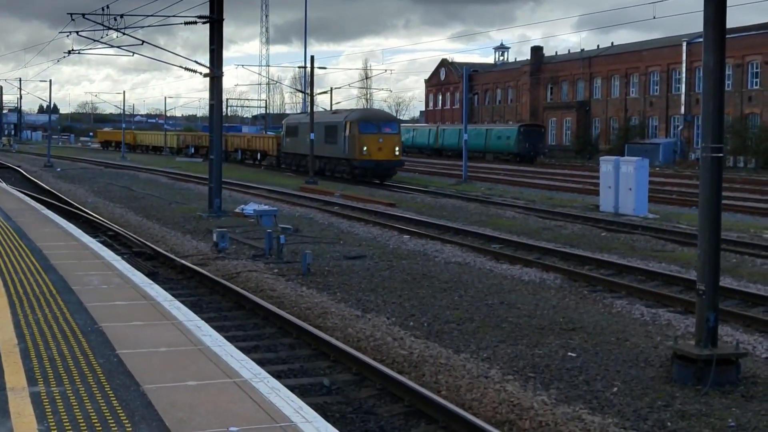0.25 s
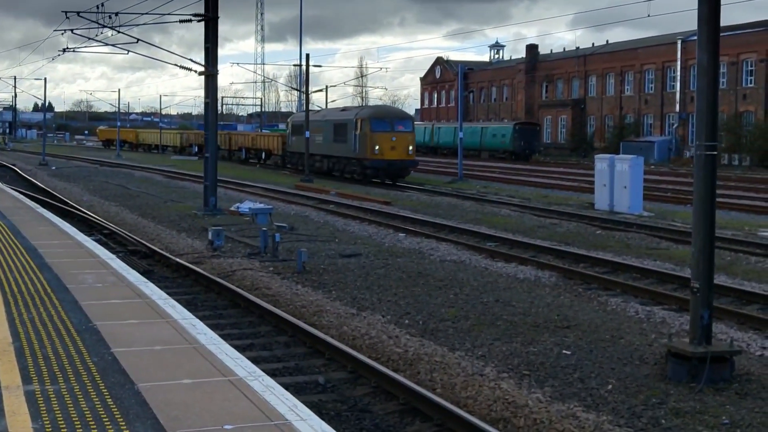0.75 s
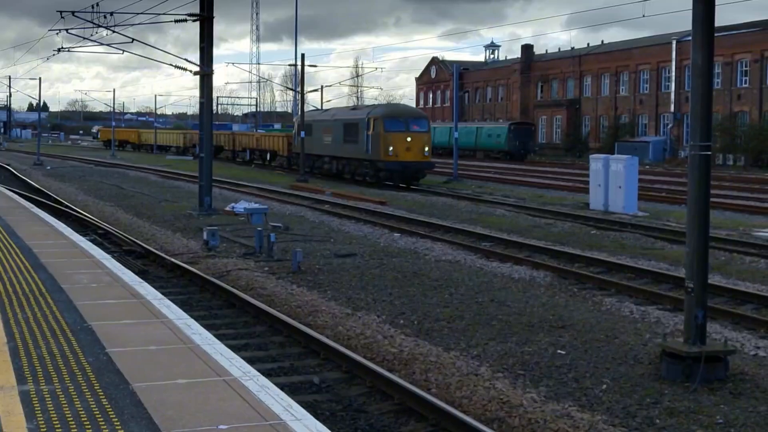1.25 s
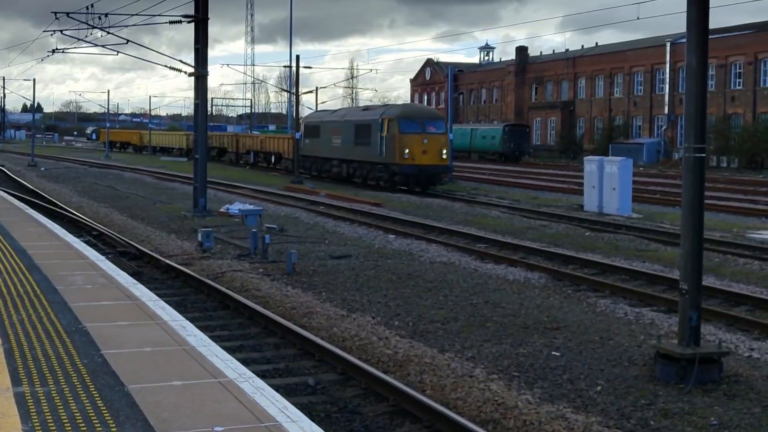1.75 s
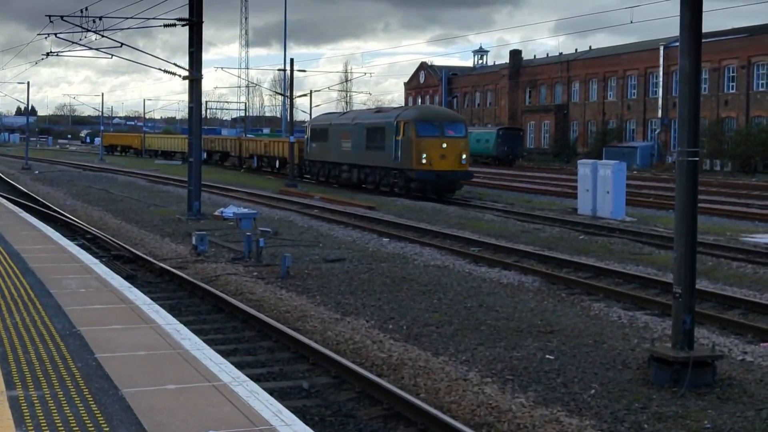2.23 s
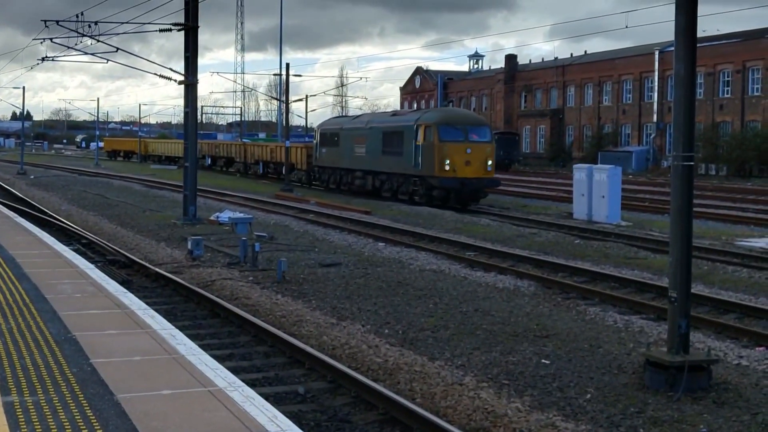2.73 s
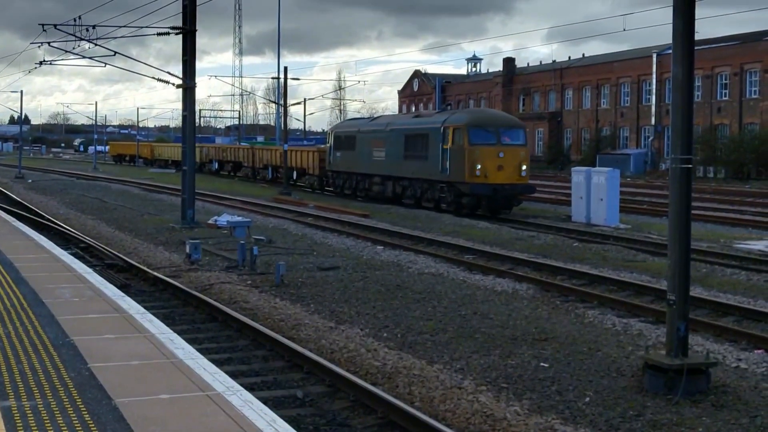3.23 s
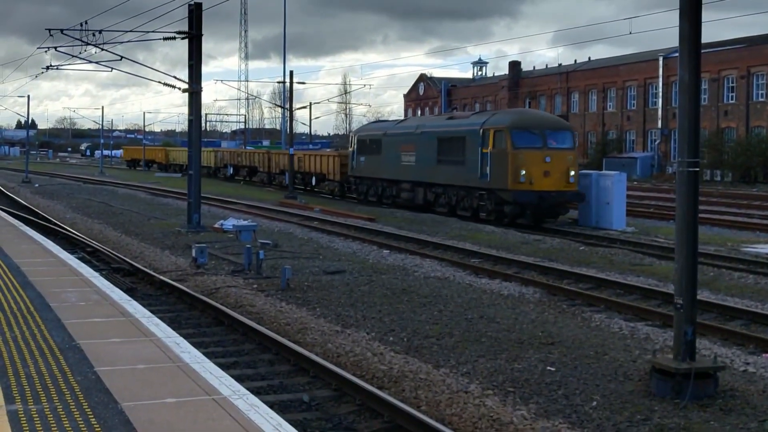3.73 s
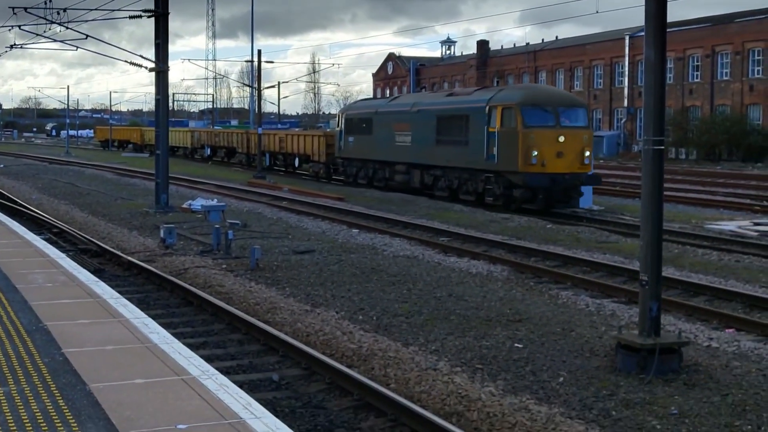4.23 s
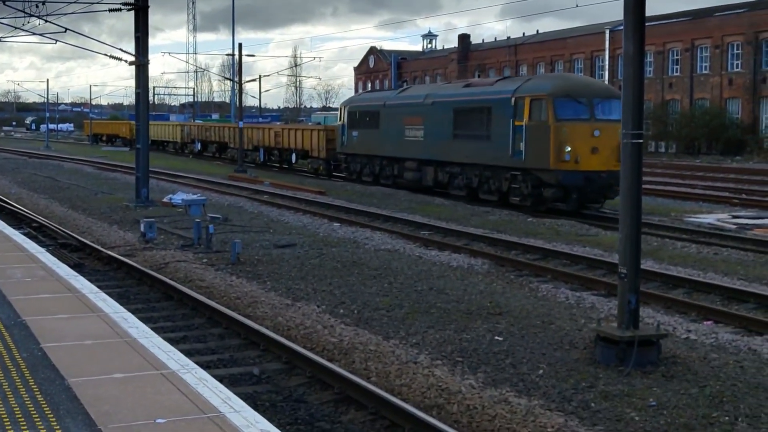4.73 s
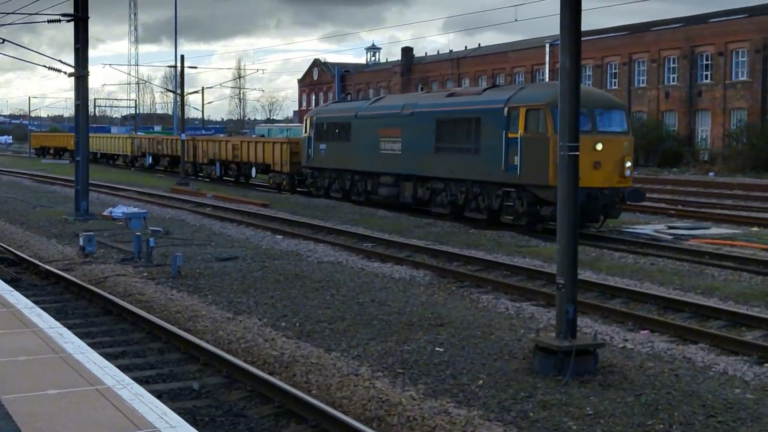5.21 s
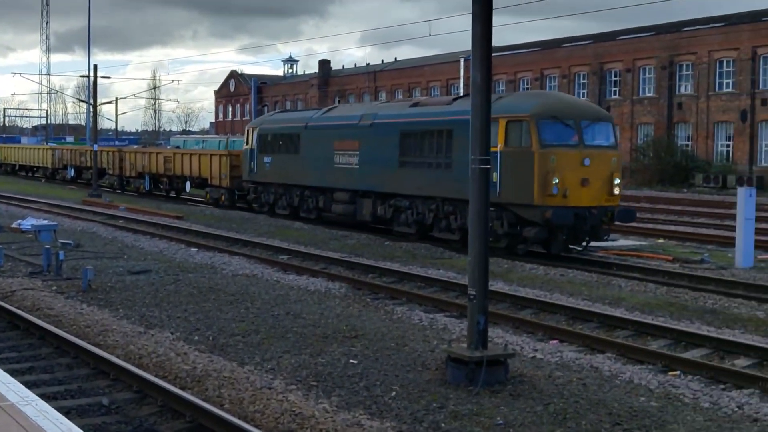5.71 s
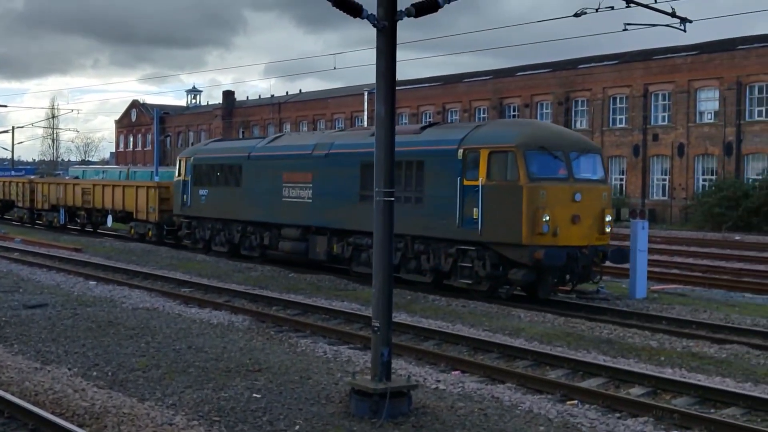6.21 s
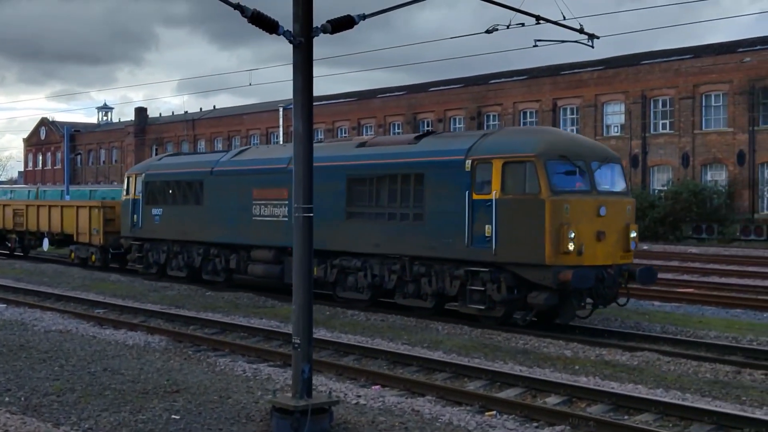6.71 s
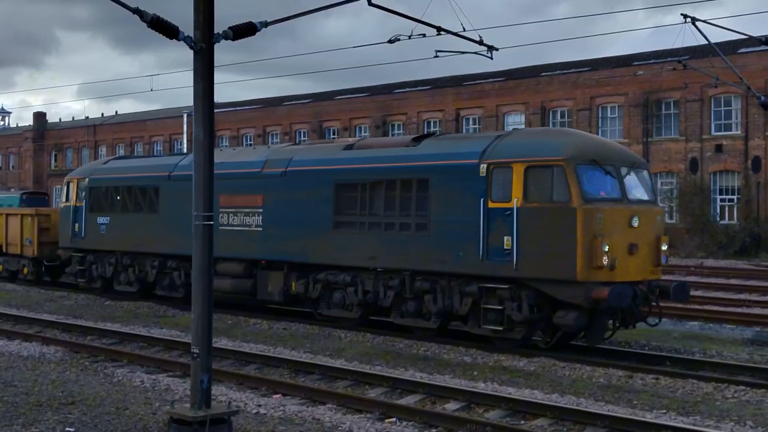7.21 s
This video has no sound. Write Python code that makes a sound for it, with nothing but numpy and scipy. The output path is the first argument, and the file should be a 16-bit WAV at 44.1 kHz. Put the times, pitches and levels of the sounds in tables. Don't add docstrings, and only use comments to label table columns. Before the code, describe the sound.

A diesel locomotive drones closer across the yard, wagons clattering over rail joints, while gusty wind thumps and roars on the microphone.

```python
import sys
import numpy as np
from scipy import signal
from scipy.fft import rfft, irfft, next_fast_len
from scipy.io import wavfile
from scipy.ndimage import uniform_filter1d

SR = 44100
rng = np.random.default_rng(int(sys.argv[2]) if len(sys.argv) > 2 else 0)


def volts_from_decibels(level):
    exponent = np.asarray(level, float) / 20
    return 10 ** exponent


def wrap_up_sound(samples):
    columns = np.atleast_2d(samples).T
    tamed = np.clip(columns, -1, 1)
    steps = np.round(tamed * 32767).astype(np.int16)
    wavfile.write(sys.argv[1], SR, steps)


N = 328986
TIME = np.arange(N) / SR
CYCLE_HZ = 4.579


def evened(x):
    return x / np.sqrt(np.mean(x ** 2) + 1e-20)


def read(points, hz):
    f, value = np.transpose(points)
    return np.interp(np.log(hz + 1), np.log(f + 1), value)


def column(table, axis):
    rows = np.array(table)
    return np.interp(TIME, rows[:, 0], rows[:, axis])


def add(mix, s, sound):
    part = mix[round(s * SR):][:len(sound)]
    part += sound[:len(part)]


def smoothed(x, rows, columns):
    return uniform_filter1d(uniform_filter1d(x, size=rows, axis=0), size=columns, axis=1)


def wander(count, size):
    return evened(uniform_filter1d(rng.standard_normal(count), size=size))


def noise(spectrum, patchy_db, flicker_db, size=1024):
    frames, hz = 4 * N // size + 5, np.fft.rfftfreq(size, 1 / SR)
    a, b, patches = rng.standard_normal((frames, len(hz), 3)).T
    patches = evened(smoothed(patches, rows=9, columns=9))
    level_db = read(spectrum, hz)[:, None] + patchy_db * patches + flicker_db * wander(frames, size=5)
    z = (a + 1j * b) * volts_from_decibels(level_db)
    return evened(signal.istft(z, nperseg=size, noverlap=3 * size // 4)[1][:N])


def cyclic(spectrum, memory):
    turn = round(SR / CYCLE_HZ)
    fresh = rng.standard_normal((N // turn + 2, turn))
    renewal = np.sqrt(1 - memory ** 2)
    kept = signal.lfilter([renewal], [1, -memory], fresh[1:], axis=0, zi=memory * fresh[:1])[0]
    size = next_fast_len(N)
    colour = volts_from_decibels(read(spectrum, np.fft.rfftfreq(size, 1 / SR)))
    return evened(irfft(rfft(kept.ravel()[:N], size) * colour, size)[:N])


def wavering(hz, width_hz, steady):
    r = np.exp(-np.pi * width_hz / SR)
    z = rng.standard_normal(N) + 1j * rng.standard_normal(N)
    for _ in range(2):
        z = signal.lfilter([1 - r], [1, -r], z)
    z = z / np.sqrt(np.mean(abs(z) ** 2))
    return evened(((steady + z) * np.exp(2j * np.pi * hz * TIME)).real)


def swells(rows, bed_db, extra_db=0):
    drop_db, curve = 15, 2.46
    s, half, db = np.array(rows)[:, :3].T
    t = TIME[::64, None]
    power = volts_from_decibels(2 * (db + extra_db - drop_db * abs((t - s) / half) ** curve)).sum(axis=1)
    return np.sqrt(volts_from_decibels(2 * bed_db) + np.interp(TIME, t[:, 0], power))


# time in seconds, nearness in dB.
NEAR = [(0.0, -12), (0.35, -10), (0.68, -14), (0.9, -11.5), (1.3, -10), (1.6, -9), (2.5, -9.5), (3.0, -6),
        (3.25, -8), (4.1, -6.5), (4.6, -7.5), (5.0, -5), (5.5, -3), (5.9, -2.5), (6.3, -1.5), (6.8, 0.5),
        (7.0, 0), (7.46, -1)]


def follows(nearest_db, per_db):
    return nearest_db + per_db * column(NEAR, axis=1)


# peak in seconds, half length in seconds, extra rumble in dB, extra hiss in dB.
SURGES = [(0.299, 0.39, -1, -4.5), (0.59, 0.047, 1, 11), (1.282, 0.055, 3.5, 9), (1.426, 0.042, 1.5, 1),
          (2.35, 0.1, 0.5, 3.5), (2.998, 0.11, -1, -1.5), (4.505, 0.39, 1, 5.5), (5.306, 0.59, -1, 2),
          (5.72, 0.11, 0.5, 2), (6.06, 0.12, 3.5, 1), (6.881, 0.069, 3.5, 8), (6.982, 0.06, -3, -5.5),
          (7.11, 0.27, 2, 3), (7.336, 0.1, 2.5, 4.5), (7.386, 0.052, -4, 0.5), (7.46, 0.03, -1, 12)]


def shudder(axis):
    rows, t = np.array(SURGES), TIME[::64, None]
    bumps = rows[:, axis] * np.exp(-2 * ((t - rows[:, 0]) / rows[:, 1]) ** 2)
    return np.interp(TIME, t[:, 0], bumps.sum(axis=1))


# time in seconds, strength in dB.
WIND = [(0.0, -28), (0.52, -29.5), (0.545, -42), (0.75, -37), (0.79, -29.5), (1.3, -26), (1.8, -25),
        (1.95, -27.5), (2.4, -27), (3.2, -27.5), (4.1, -27.5), (4.5, -26.5), (5.2, -24.5), (6.5, -22.5),
        (7.0, -30.5), (7.33, -19), (7.37, -48), (7.46, -22)]
# peak in seconds, half length in seconds, buffeting in dB, upper roar relative in dB.
GUSTS = [(0.25, 0.056, -22, -14.5), (0.365, 0.035, -16.5, -14), (0.461, 0.034, -11, -17),
         (0.932, 0.07, -24.5, -11), (1.123, 0.022, -25, -3.5), (1.43, 0.095, -29, -11),
         (1.508, 0.062, -20, -14), (1.68, 0.095, -21.5, -30), (2.025, 0.03, -22, -10.5),
         (2.118, 0.15, -21.5, -20), (2.58, 0.054, -25.5, -31), (2.746, 0.03, -23.5, -14),
         (2.96, 0.075, -22.5, -25.5), (3.475, 0.054, -37, -12), (3.91, 0.098, -30, -5.5),
         (4.487, 0.17, -26.5, -7.5), (4.72, 0.22, -37, -20), (5.34, 0.17, -22.5, -15),
         (5.624, 0.035, -25, -4), (5.902, 0.03, -32, -3), (6.17, 0.1, -28, -6), (6.297, 0.094, -22, -9),
         (6.57, 0.06, -35.5, 1), (6.685, 0.04, -17.5, -4), (6.772, 0.06, -18.5, 0),
         (6.871, 0.08, -19.5, 1.5), (6.987, 0.072, -26.5, 3), (7.064, 0.061, -16.5, 2.5),
         (7.148, 0.1, -15.5, -3.5), (7.215, 0.039, -18.5, -1.5), (7.312, 0.059, -15.5, -8.5)]
# frequency in Hz, level in dB per Hz.
BUFFET = [(8.8, -38.5), (15, -12), (29, 1.5), (48, -0.5), (109, -8.5), (140, -19.5), (166, -17),
          (200, -19.5), (260, -33.5), (440, -120)]
# frequency in Hz, level in dB per Hz.
UPPER_WIND = [(60, -24.5), (110, 10.5), (200, -1.5), (350, -8.5), (500, -20.5), (800, -31), (1200, -46),
              (2500, -120)]
# start in seconds, length in seconds, level in dB.
PUFFS = [
    (6.672, 0.074, -31.5),
    (6.736, 0.06, -27),
    (6.836, 0.026, -34),
    (6.878, 0.027, -44),
    (7.039, 0.062, -17),
    (7.111, 0.04, -23),
    (7.143, 0.055, -21),
    (7.197, 0.055, -30),
    (7.273, 0.067, -30.5),
]
# frequency in Hz, level in dB per Hz.
PUFF_COLOUR = [(60, -30), (110, 2), (200, -2), (350, -4), (600, -10.5), (950, -20), (1300, -33),
               (2500, -120)]
# peak in seconds, half length in seconds, level in dB.
MOANS = [
    (5.64, 0.1, -33.5),
    (6.05, 0.3, -36),
    (6.45, 0.41, -36.5),
]


def wind():
    strength = column(WIND, axis=1)
    low = volts_from_decibels(1.67) * swells(GUSTS, strength) * noise(BUFFET, patchy_db=1.0, flicker_db=0.5, size=2048)
    low = low + swells(MOANS, bed_db=-74.5) * wavering(hz=282.7, width_hz=73, steady=0)

    common = noise(UPPER_WIND, patchy_db=1.5, flicker_db=1.0, size=512)
    apart = noise(UPPER_WIND, patchy_db=1.5, flicker_db=1.0, size=512)
    upper = np.array([1.06 * common + 0.21 * apart, 1.35 * common - 0.064 * apart])
    bed_db = -40 + 0.45 * (strength - strength.mean())
    upper = volts_from_decibels(-2.5) * swells(GUSTS, bed_db, extra_db=np.array(GUSTS)[:, -1]) * upper

    puffs = np.zeros(N)
    for s, length, db in PUFFS:
        add(puffs, s, volts_from_decibels(db) * signal.windows.tukey(round(length * SR), .6))
    puffs = puffs * noise(PUFF_COLOUR, patchy_db=1.5, flicker_db=1, size=512)
    return low + upper + np.array([[.2], [1.8]]) * puffs


# snap in seconds, peak in dB, lead of its first tick in seconds.
SNAPS = [
    (3.08, -46.5, 0.052),
    (3.3586, -48, .0395),
    (4.28, -47.5, 0.038),
    (4.553, -47.5, 0.025),
    (4.829, -48, 0.032),
]
# time in seconds, peak in dB.
RUSTLES = [(0.3406, -71), (0.4763, -60), (0.7294, -68.5), (1.06, -73.5), (1.3212, -64), (1.37, -67),
           (1.43, -71), (1.49, -71), (5.3378, -72), (6.83, -63), (6.8694, -58)]
# frequency in Hz, level in dB.
TICK_COLOUR = [(1500, -15), (3000, 7), (6000, 13.5), (8000, 0), (9000, -2), (14000, -1), (16000, -16)]


def ticks():
    out, t = np.zeros(N), np.arange(6000) / SR
    hz = np.fft.rfftfreq(len(t), 1 / SR)
    colour = volts_from_decibels(read(TICK_COLOUR, hz))
    snaps = []
    for s, db, lead in SNAPS:
        snaps += [(s - lead, db - 9.5), (s, db), (s + 0.053, db - 9)]
    rustle_colour = colour * (hz > 9300)
    for group, tint, t60 in ((snaps, colour, .045), (RUSTLES, rustle_colour, .24)):
        for s, db in group:
            burst = irfft(rfft(rng.standard_normal(len(t))) * tint, len(t))
            add(out, s - .001, volts_from_decibels(db + 6) * burst * (1 - np.exp(-t / .001)) * volts_from_decibels(-60 * t / t60))
    return out


# time in seconds, peak in dB, ring in Hz, low clank relative in dB.
JOINTS = [(0.5753, -51, 7200, 7), (1.364, -48.5, 7350, 0), (1.772, -44.5, 6440, -11),
          (1.803, -49, 7000, 5.5), (2.1284, -46.5, 7000, 3), (2.3146, -42, 6800, 1),
          (2.374, -42.5, 6700, 0), (2.4015, -57, 6600, -9), (2.5195, -43, 6600, -6), (2.6537, -47, 7290, 3),
          (2.702, -46, 7400, 2), (2.725, -43, 6800, -3), (2.985, -48, 6700, 2), (3.03, -42, 6700, 4),
          (3.074, -47, 7070, 4), (3.254, -46, 7550, -19), (3.3588, -47, 5700, 7), (3.939, -43, 7100, -16),
          (4.2822, -43, 6450, -6), (4.493, -40, 7100, -2), (4.52, -40, 7050, -9), (4.555, -37.5, 6950, -13),
          (4.8276, -51, 5600, -9), (4.8807, -42, 6970, -13), (4.9747, -41, 6500, -9),
          (5.208, -43, 6530, -4), (5.3368, -40, 6550, -9), (5.434, -50, 7070, -5), (5.5, -43, 7000, -4),
          (5.6048, -42, 7380, 4), (6.118, -37.5, 7730, -17), (6.319, -39.5, 7500, -10),
          (6.4832, -41, 7100, -7.5), (6.8364, -37, 6560, -9), (7.086, -38.5, 7450, -7)]
# time in seconds, peak in dB.
FAR_JOINTS = [(0.212, -54), (0.3733, -56), (0.4424, -54.5), (1.5673, -56.5), (2.1983, -48), (2.469, -50),
              (2.887, -50), (3.321, -55), (3.429, -51), (3.5957, -54.5), (3.724, -49.5), (3.8107, -53),
              (3.959, -57), (4.201, -49.5), (4.36, -51), (4.3864, -52), (4.4603, -47), (5.663, -42),
              (6.0367, -51), (6.2805, -42), (6.6852, -60), (7.269, -43)]


def joints():
    out, t = np.zeros(N), np.arange(6000) / SR
    hz = np.fft.rfftfreq(len(t), 1 / SR)

    def hump(centre_hz, width_hz, order=6):
        return 1 / (1 + ((hz - centre_hz) / width_hz) ** order)

    far = [(s, db, 6570 + 360 * rng.standard_normal(), -4.5) for s, db in FAR_JOINTS]
    shape = (1 - np.exp(-t / 0.007)) * volts_from_decibels(-60 * t / 0.11)
    for s, db, ring_hz, clank_db in JOINTS + far:
        ring = hump(ring_hz, 330) + 0.78 * hump(7200, 450) + 0.67 * hump(6280, 220)
        clank = volts_from_decibels(clank_db + 1.0) * hump(2900, 1200)
        sheen = volts_from_decibels(-16) * hump(10100, 400, order=4)
        burst = irfft(rfft(rng.standard_normal(len(t))) * (ring + clank + sheen), len(t))
        rattle = volts_from_decibels(3.5 * wander(len(t), size=250))
        add(out, s - .002, volts_from_decibels(db + 8.0) * burst * shape * rattle)
    return out


# time in seconds, peak in dB, pitch in Hz.
PINGS = [(2.5042, -44, 6600), (2.5202, -44, 6670), (2.6683, -54, 7300), (2.7307, -46, 5960),
         (2.732, -54, 7300), (2.743, -46, 7350), (2.742, -44, 6200), (2.758, -47, 7300), (3.047, -50, 5700),
         (3.255, -64.5, 7400), (4.2672, -48, 6900), (4.465, -44, 6170), (4.4917, -40, 6140),
         (4.512, -43, 6250), (4.53, -41, 6250), (4.51, -42, 7150), (4.54, -42, 7100), (4.795, -50, 7000),
         (5.7269, -41, 7100), (6.0197, -42, 6940)]


def pings():
    out, t = np.zeros(N), np.arange(3000) / SR
    shape = (1 - np.exp(-t / 0.0016)) * volts_from_decibels(-60 * t / 0.029)
    for s, db, hz in PINGS:
        ring = np.sin(2 * np.pi * hz * t) + .6 * np.sin(2 * np.pi * 1.035 * hz * t)
        add(out, s - .002, volts_from_decibels(db + 3.5) * ring * shape)
    return out


def echoed(x, wet_db, t60):
    t = np.arange(SR // 4) / SR
    taps = rng.standard_normal(len(t)) * (rng.random(len(t)) < .05) * volts_from_decibels(-60 * t / t60)
    return x + volts_from_decibels(wet_db) * signal.oaconvolve(x, taps / np.linalg.norm(taps))[:N]


# start in seconds, length in seconds, pitch in Hz, level, second and fifth partial in dB.
SQUEALS = [
    (1.096, 0.205, 1397, -52.5, 3.5, -2.5),
    (3.462, 0.15, 1387, -51.5, -23, -33),
    (5.503, 0.091, 1420, -48, -17, -26),
    (6.369, 0.3, 1374, -40, -18, -19),
]


def squeals():
    out = np.zeros(N)
    for s, length, hz, db, second_db, fifth_db in SQUEALS:
        t = np.arange(round(length * SR)) / SR
        wobble, fuzz = wander(len(t), size=900), wander(len(t), size=150)
        pitch = hz * (1 + .001 * wobble + .008 * (t / length) ** 6)
        turn = 2 * np.pi * np.cumsum(pitch) / SR
        tone = np.sin(turn) + volts_from_decibels(second_db) * t / length * np.sin(2 * turn)
        if 5 * hz < SR / 2:
            tone = tone + volts_from_decibels(fifth_db) * np.sin(5 * turn + .8 * fuzz)
        fade = signal.windows.tukey(len(t), .45) * np.minimum(t / .05, 1)
        add(out, s, volts_from_decibels(db + 1.2 * wobble) * tone * fade)
    return out


THROB_PHASE = 4.97
# peak in seconds, half length in seconds, level in dB.
BEATS = [
    (2.9, .6, -65),
    (3.95, 0.26, -50.5),
    (4.6, 0.52, -49.5),
    (5.2, 0.53, -46.5),
    (6.2, 0.37, -57.5),
]


def beats():
    turn = 4 * np.pi * CYCLE_HZ * TIME + THROB_PHASE + .1
    bend = 20 / (2 * CYCLE_HZ) * np.sin(turn - 1.6)
    heavier = 1 + .25 * np.cos(turn / 2 + 3.15)
    core = evened((1 + np.cos(turn)) * np.sin(2 * np.pi * 721 * TIME + bend))
    return swells(BEATS, bed_db=-69.5) * heavier * core


# frequency in Hz, level in dB per Hz.
DRONE = [(600, -30.5), (670, -5), (705, 6.5), (720, 8), (740, 2), (785, -11), (860, -42.5)]
# peak in seconds, half length in seconds, level in dB.
BLOWER = [
    (0.1, 0.41, -66),
    (2.2, 0.43, -59.5),
    (2.55, 0.35, -63.5),
    (2.72, 0.11, -53),
    (4.4, .2, -62),
    (5.68, 0.33, -50),
    (6.28, 0.16, -53.5),
    (6.69, 0.18, -50.5),
    (7.14, 0.27, -49),
    (7.46, .1, -51),
]
# peak in seconds, half length in seconds, level in dB.
TRACTION = [
    (0.0, 0.2, -53),
    (2.87, 0.27, -54.5),
    (3.72, 0.33, -60.5),
    (4.45, 0.24, -52.5),
    (4.97, 0.52, -50),
    (6.13, 0.16, -39),
    (6.32, 0.085, -47),
    (6.8, 0.17, -41),
    (7.27, 0.13, -41.5),
]
# frequency in Hz, waver width in Hz, relative level in dB.
GEARS = [(358, 30, 7), (442, 30, 6), (1446, 16, -6), (1869, 30, -1.5), (2432, 32, 1.5), (2676, 8, -9),
         (3542, 45, -7), (3215, 60, -6), (845, 27, -1), (1010, 70, 0)]
# peak in seconds, half length in seconds, level in dB.
RAIL_RING = [
    (1.27, .08, -64),
    (3.0, 0.13, -62.5),
    (5.7, 0.19, -46.5),
    (6.05, 0.19, -42.5),
    (6.3, .15, -49),
    (6.62, 0.13, -49),
    (6.9, 0.11, -51),
    (7.25, 0.23, -50),
]


def whines():
    drone = .75 * cyclic(DRONE, memory=.9) + .45 * wavering(hz=719, width_hz=7, steady=1.6)
    drone = drone * volts_from_decibels(follows(-51.5, per_db=0.99) + 1.1 * shudder(axis=2) + 2.5)
    drone = drone * (1 + .7 * np.cos(4 * np.pi * CYCLE_HZ * TIME + THROB_PHASE))

    blower_level = volts_from_decibels(-2) * swells(BLOWER, follows(-56, per_db=0.98) - 2)
    blower = blower_level * wavering(hz=4441, width_hz=36, steady=.45)
    traction_level = volts_from_decibels(-6.5) * swells(TRACTION, follows(-55.5, per_db=0.76))
    traction = traction_level * wavering(hz=1330, width_hz=10, steady=.8)
    gears = sum(volts_from_decibels(db) * wavering(hz, width_hz, steady=0.076) for hz, width_hz, db in GEARS)
    gears = gears * volts_from_decibels(follows(-56, per_db=0.7))
    rails = swells(RAIL_RING, bed_db=-76.5) * wavering(hz=2153, width_hz=420, steady=0)
    return drone + beats() + rails + blower + traction + gears


# frequency in Hz, waver width in Hz, relative level in dB.
THRUM = [(41.93, 5.6, 2), (68.8, 3.3, -13), (105.3, 5.9, -15), (27.1, 3.3, -13.5)]
# peak in seconds, half length in seconds, level in dB.
THROBS = [(0.19, 0.17, -17.5), (0.35, 0.077, -19), (0.47, 0.061, -16.5), (0.93, 0.13, -30),
          (1.17, 0.19, -22.5), (1.52, 0.088, -26.5), (1.69, 0.14, -18.5), (2.13, 0.21, -21.5),
          (2.39, 0.051, -20.5), (2.67, 0.14, -17.5), (2.82, 0.092, -16), (2.95, 0.13, -17.5),
          (3.36, 0.047, -23.5), (3.47, 0.061, -21.5), (3.62, 0.061, -21.5), (3.75, 0.067, -20),
          (4.15, 0.27, -24.5), (4.45, 0.35, -26.5), (4.85, 0.16, -36), (5.08, 0.18, -33),
          (5.27, 0.18, -19.5), (5.45, 0.074, -28), (5.71, 0.12, -28), (5.9, 0.058, -45), (6.01, 0.05, -17),
          (6.25, 0.038, -16.5), (6.67, 0.046, -20), (6.79, 0.046, -22), (7.1, 0.1, -21.5),
          (7.27, 0.098, -15)]
# peak in seconds, half length in seconds, level in dB.
BOOMS_69_HZ = [
    (1.45, 0.15, -24),
    (3.0, .08, -34),
    (4.38, 0.077, -23),
    (4.6, 0.03, -17),
    (4.71, 0.049, -19),
    (5.0, 0.17, -32),
    (5.9, 0.052, -22.5),
    (6.02, 0.12, -26),
    (6.2, .1, -28),
]
# peak in seconds, half length in seconds, level in dB.
BOOMS_105_HZ = [
    (.93, 0.033, -27),
    (1.08, .12, -32.5),
    (1.3, 0.088, -29.5),
    (4.55, 0.11, -27.5),
    (5.0, 0.06, -27),
    (3.25, 0.18, -34.5),
    (7.16, 0.089, -21),
]


def thrum():
    tones = [wavering(hz, width_hz, steady=2.6) for hz, width_hz, db in THRUM]
    together = swells(THROBS, column(WIND, axis=1) - 4)
    levels = [volts_from_decibels(db - 2.5) * together for hz, width_hz, db in THRUM]
    for k, booms in enumerate((BOOMS_69_HZ, BOOMS_105_HZ), start=1):
        levels[k] = np.hypot(levels[k], swells(booms, bed_db=-73.0))
    return sum(level * tone for level, tone in zip(levels, tones))


# frequency in Hz, level in dB per Hz.
ROAR = [(150, -23.5), (250, 0.5), (393, -14), (438, -6.5), (538, -14.5), (722, -2.5), (825, -14),
        (1150, -22), (1500, -48), (2530, -120)]
# frequency in Hz, level in dB per Hz.
ROLLING = [(560, -39), (950, -3), (1110, -10.5), (1340, -1), (1690, -2), (2210, -1.5), (2480, -5),
           (2650, -10.5), (3520, -7), (4190, -14.5), (4280, -16.5), (4540, -15), (4670, -19), (5400, -20.5),
           (7020, -41.5), (11900, -120)]
# frequency in Hz, level in dB per Hz.
HISS = [(2700, -35), (4600, -5), (5300, -12), (6200, -5), (7100, -2.5), (7600, -6.5), (8050, -15),
        (8800, -36.5), (9500, -23), (10100, -17.5), (10750, -34), (11300, -31), (14300, -32), (15000, -37),
        (15300, -52), (16500, -63)]


def locomotive():
    rumble_db, hiss_db = shudder(axis=2), shudder(axis=3)
    roar = evened(noise(ROAR, patchy_db=0.5, flicker_db=0.2) + cyclic(ROAR, memory=.9))
    roar = roar * volts_from_decibels(follows(-40.5, per_db=0.7) + 0.53 * rumble_db + 3.0)
    rolling_db = follows(-39, per_db=1.16) + 1.1 * rumble_db + 0.05 * hiss_db + 0.69
    rolling = volts_from_decibels(rolling_db) * noise(ROLLING, patchy_db=1.5, flicker_db=0.68)
    hiss = noise(HISS, patchy_db=2.0, flicker_db=0.5)
    hiss = hiss * volts_from_decibels(follows(-54, per_db=1.58) + hiss_db + 4.0)
    return roar + rolling + hiss


# frequency in Hz, left-right likeness from 0 to 1.
SAME = [(300, 1), (470, 0.85), (700, 0.64), (1200, 0), (2500, 0.58), (4000, 0.13), (8000, 0.01),
        (14000, 0.045)]
# frequency in Hz, left minus right in dB.
TILT = [(300, -1), (600, 4), (900, 0.5), (1450, 3.5), (2470, -1.5), (4210, -3), (7160, 6), (13000, 0.5)]


def scene():
    tones, blows = volts_from_decibels(2.0) * (whines() + squeals()), joints() + pings()
    heard = []
    for lag in (0, 31):
        port = locomotive() + ticks() + echoed(blows, wet_db=-4.5, t60=0.29) + np.roll(tones, shift=lag)
        heard.append(rfft(port))
    hz = np.fft.rfftfreq(N, 1 / SR)
    same, tilt_db = np.clip(read(SAME, hz), 0, 1), read(TILT, hz)
    mid, side = np.sqrt((1 + same) / 2) * heard[0], np.sqrt((1 - same) / 2) * heard[1]
    ports = np.array([(mid + side) * volts_from_decibels(tilt_db / 2), (mid - side) * volts_from_decibels(-tilt_db / 2)])
    return (irfft(ports, N) + wind() + thrum()) * np.minimum(TIME / .004, 1)


# frequency in Hz, threshold in dB.
TOP_GATE = [(8000, -96), (8400, -89.5), (9000, -91.5), (9500, -95.5), (10000, -94.5), (10800, -97.5),
            (11500, -105), (14500, -106), (15000, -97), (15300, -84)]
# peak in seconds, half length in seconds, rise in dB.
TOP_LULLS = [
    (1.2, .08, 5),
    (4.44, .05, 5),
    (4.72, .05, 5),
    (5.05, .1, 3),
    (5.5, .25, -2),
    (5.9, .08, 4),
    (6.26, .1, 5),
]


def thinned(x):
    hz, t, z = signal.stft(x, SR, nperseg=2048, noverlap=1536)
    power = uniform_filter1d((abs(z) ** 2).mean(0), size=3, axis=0)
    level_db = 10 * np.log10(abs(power) + 1e-20)
    wide_db = 10 * np.log10(abs(smoothed(power, rows=40, columns=3)) + 1e-20)
    scatter = evened(smoothed(rng.standard_normal(power.shape), rows=7, columns=5))
    slow = evened(uniform_filter1d(scatter.mean(0), size=18))

    gate_db = read(TOP_GATE, hz)[:, None]
    gate_db = gate_db + sum(db * np.exp(-((t - s) / half) ** 2) for s, half, db in TOP_LULLS)
    bar_db = np.maximum(gate_db + 3 * scatter + .6 * slow, wide_db - 1.5 + 4.5 * scatter)
    keep = np.where(hz[:, None] < 7800, 1, np.clip(level_db - bar_db + .5, 0, 1))
    keep[(abs(hz[:, None] - 5400) < 600) & (scatter > 1.65)] = 0
    return signal.istft(z * keep, SR, nperseg=2048, noverlap=1536)[1][:, :N]


def roll_off(x):
    return signal.sosfilt(signal.butter(12, 15700, fs=SR, output="sos"), x)


def record(dry):
    mid, side = (dry[0] + dry[1]) / 2, (dry[0] - dry[1]) / 2
    side = signal.sosfiltfilt(signal.butter(10, 352, "high", fs=SR, output="sos"), side)
    mid = .88 * np.tanh((mid - mid.mean()) / .88)
    mix = thinned(np.array([mid + side, mid - side]))
    return roll_off(mix)


dry = scene()
out = record(dry)
wrap_up_sound(out)
```